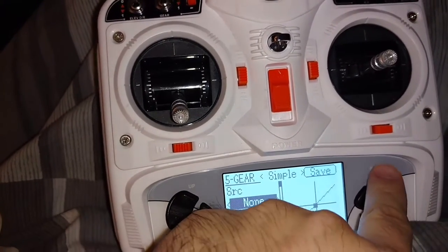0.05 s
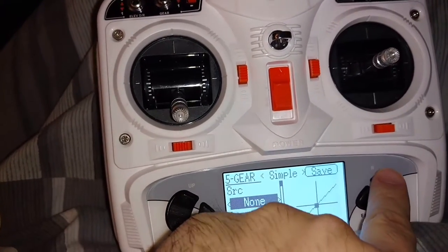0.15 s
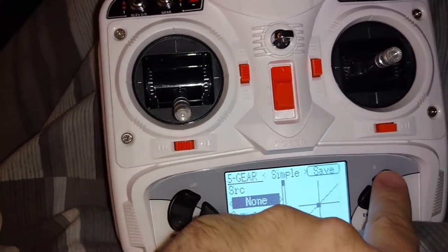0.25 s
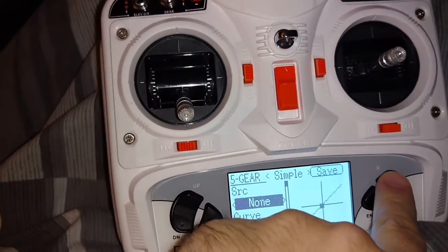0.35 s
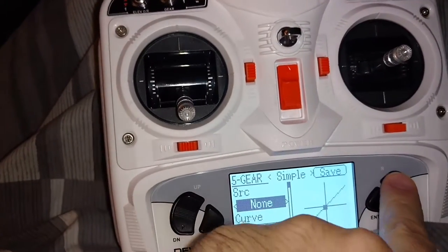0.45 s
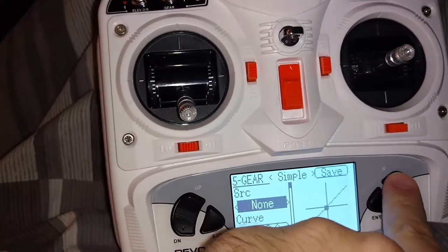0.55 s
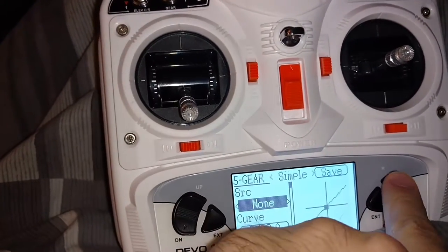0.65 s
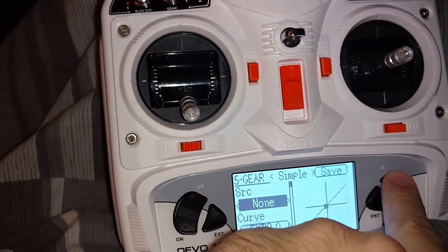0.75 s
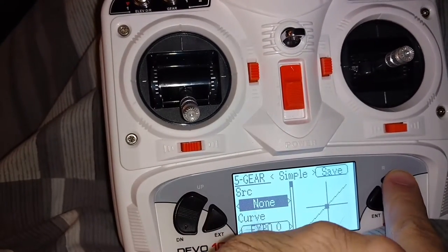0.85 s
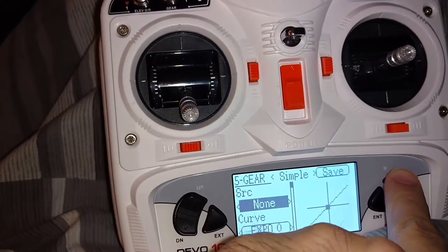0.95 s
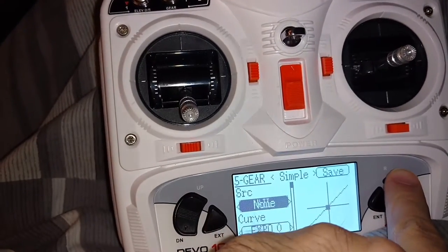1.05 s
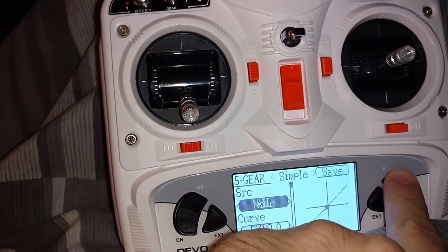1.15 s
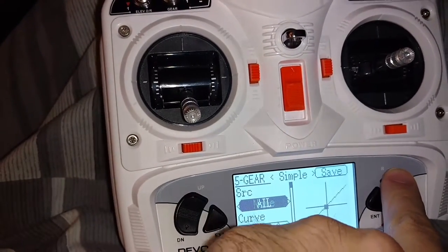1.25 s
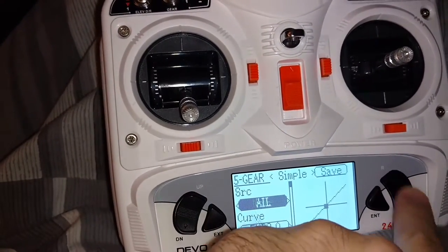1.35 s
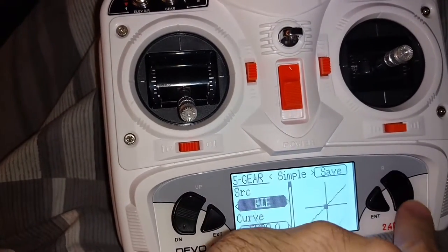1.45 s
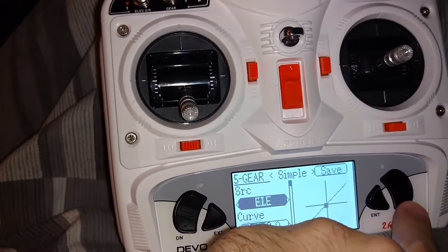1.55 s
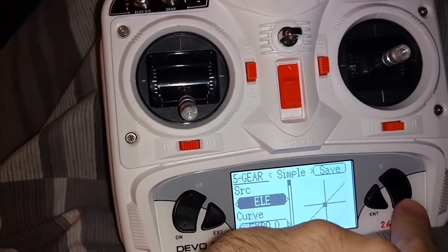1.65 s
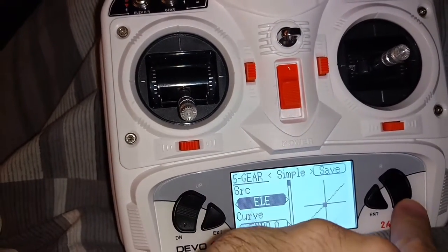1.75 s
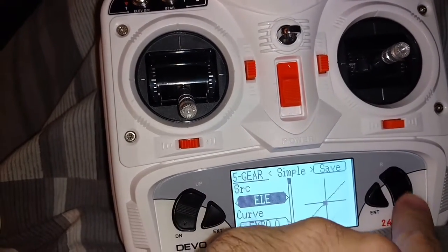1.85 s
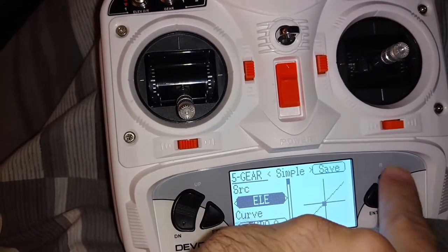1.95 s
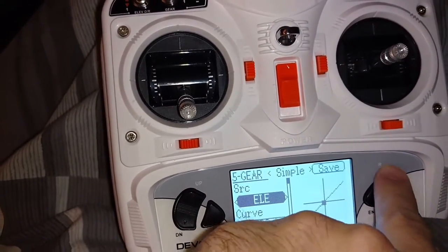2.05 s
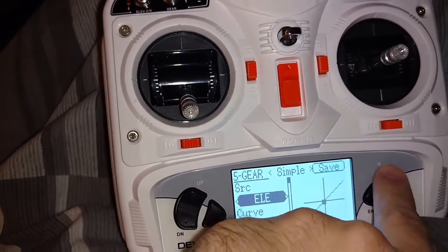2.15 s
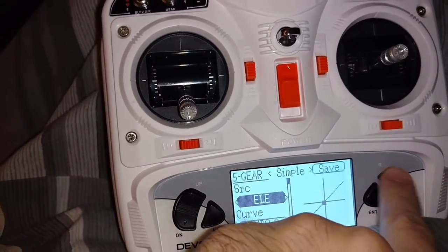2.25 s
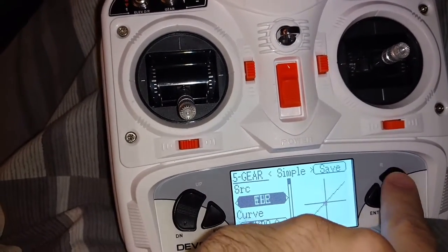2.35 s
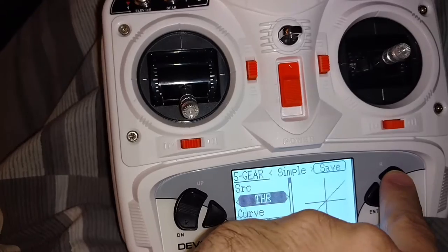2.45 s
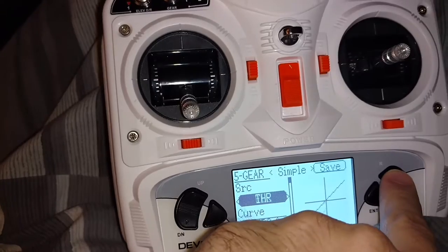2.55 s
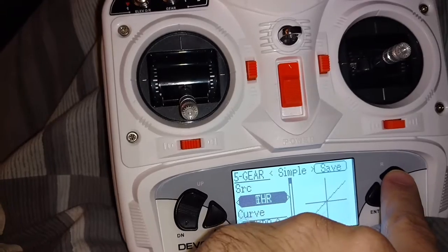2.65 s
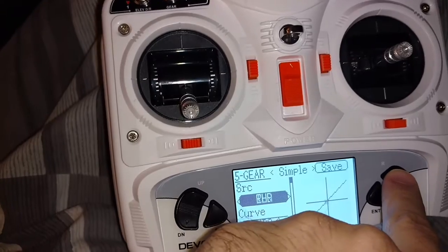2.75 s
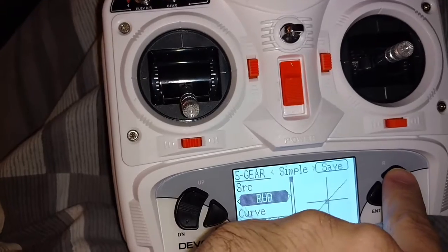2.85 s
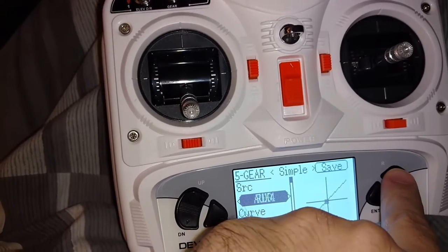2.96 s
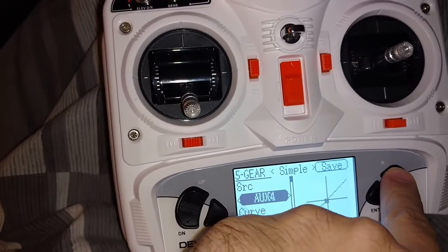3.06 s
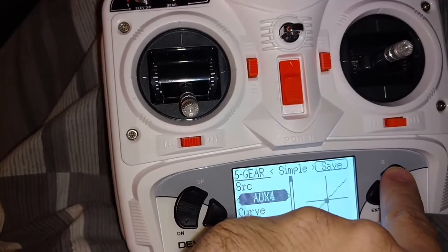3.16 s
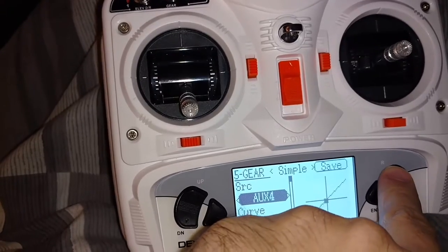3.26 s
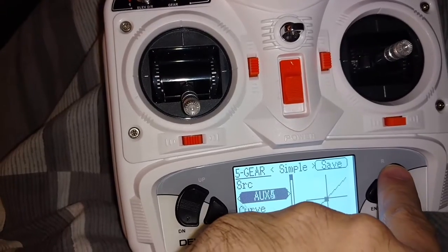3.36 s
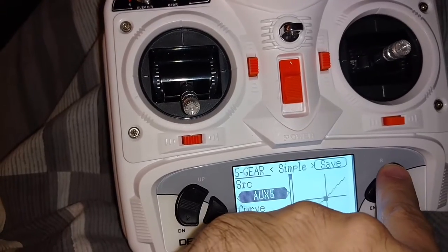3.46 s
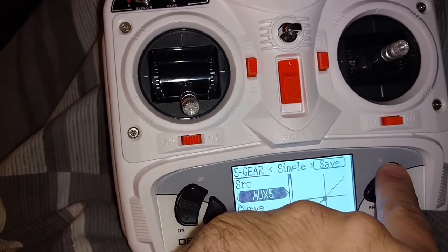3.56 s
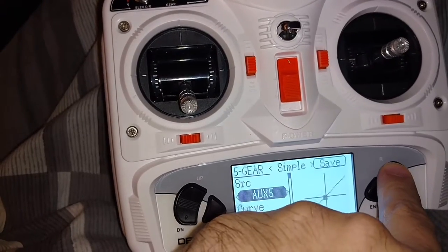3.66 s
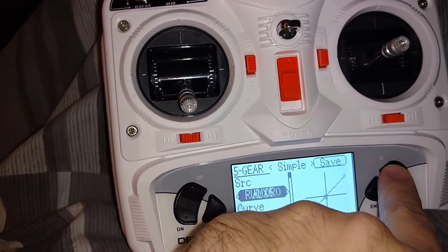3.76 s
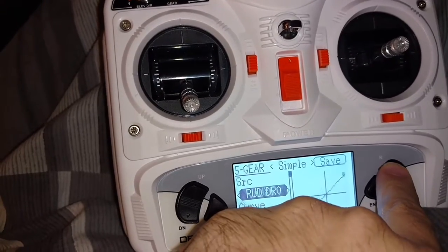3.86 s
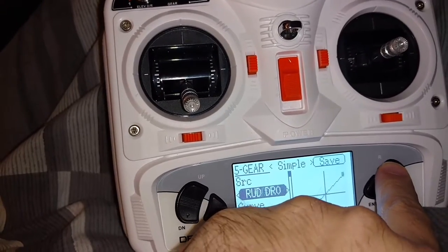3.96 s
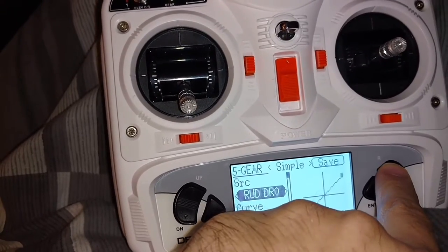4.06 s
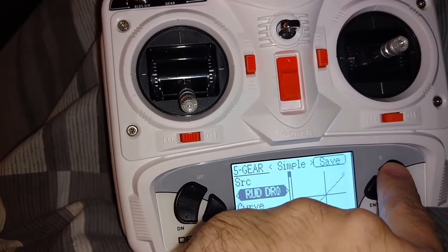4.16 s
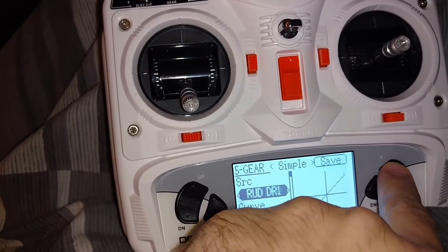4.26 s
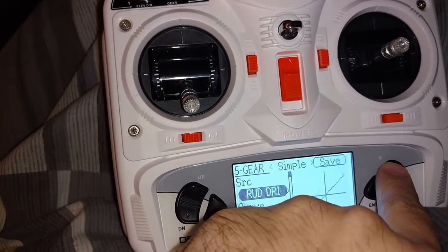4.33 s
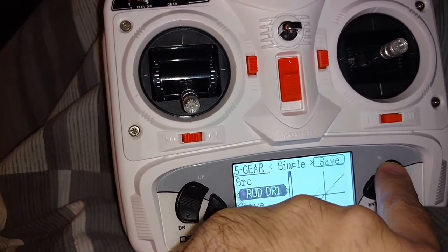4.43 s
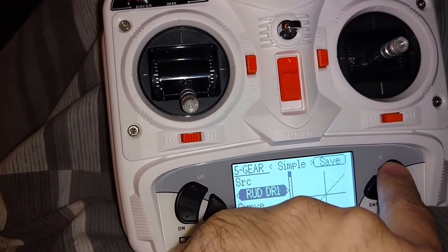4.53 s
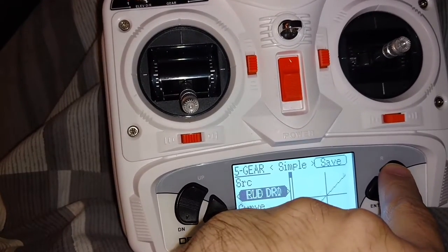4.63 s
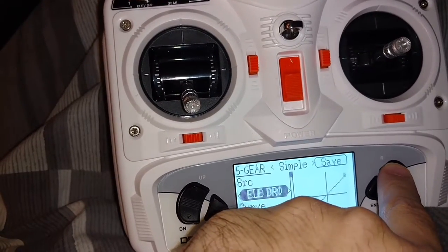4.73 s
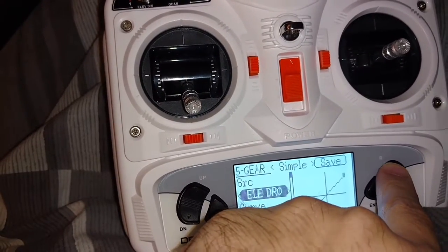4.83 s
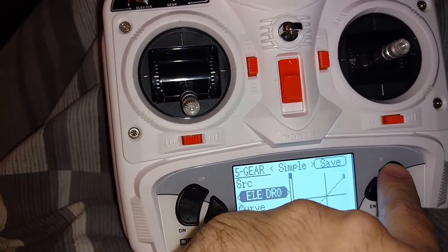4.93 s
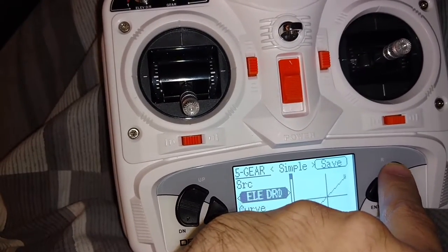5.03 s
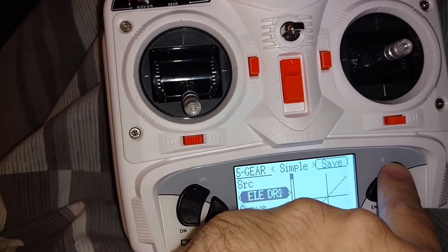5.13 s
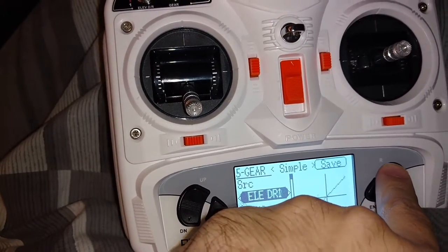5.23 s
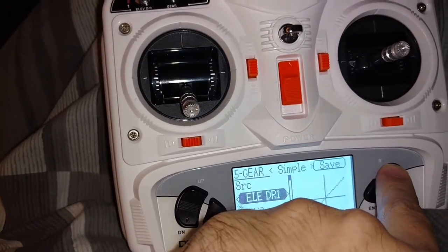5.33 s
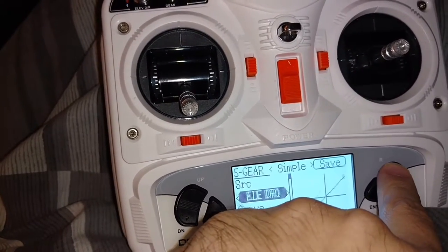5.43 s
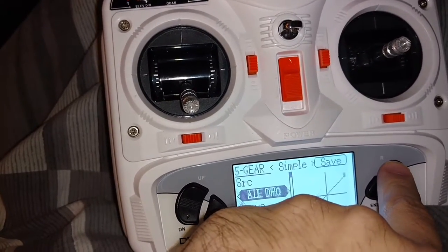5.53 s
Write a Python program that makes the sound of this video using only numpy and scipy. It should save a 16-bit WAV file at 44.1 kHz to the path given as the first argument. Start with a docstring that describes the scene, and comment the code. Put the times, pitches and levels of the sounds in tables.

```python
"""Dome-switch button on a hollow handset

In a quiet bedroom a thumb works a button: each press and release snaps a dome switch, exciting decaying
modes of dome and hollow case, with a noisy crack, a dull room tail and a bright echo. Below lie coloured
room noise, sine hum and whines, a regular resonant tick and sleeve rustle made of dense noise slips.
Two capsules listen, far (left) and near (right) for the button; the recorder widens the image by
subtracting from each a late copy of the other, then turns down loud sound and cuts the top."""
import sys
import numpy as np
from scipy import signal
from scipy.fft import rfft, irfft, next_fast_len
from scipy.io import wavfile
from scipy.ndimage import uniform_filter1d

SR = 44100
rng = np.random.default_rng(int(sys.argv[2]) if len(sys.argv) > 2 else 0)


def unload_wav(signal):
    """Save mono or channel-first audio to the path in sys.argv[1] as 16-bit WAV at rate SR, clipped to [-1, 1]."""
    wavfile.write(
        sys.argv[1],
        SR,
        np.round(np.clip(np.atleast_2d(signal).T, -1, 1) * 32767).astype(np.int16),
    )


N = 246519
HISS_EDGE_HZ = 15300   # room tone and rustle end here


def amp(db):
    """Logarithmic level: decibels to amplitude gain."""
    return 10 ** (np.asarray(db) / 20)


def at_hz(points, hz, column=1):
    """Spectral envelope: a table column interpolated on a log-frequency axis."""
    p = np.array(points)
    return np.interp(np.log(hz + 1), np.log(p[:, 0]), p[:, column])


def ring(clicks, hz, t60):
    """Damped resonator: a unit click starts a decaying sine of initial height 1."""
    radius = amp(-60 / (t60 * SR))
    angle = 2 * np.pi * hz / SR
    # the tiny offset keeps the filter state from fading to zero
    return signal.lfilter([0, np.sin(angle)], [1, -2 * radius * np.cos(angle), radius ** 2], clicks + 1e-18)


def train(times, sizes):
    """Impulse excitation: clicks of the given sizes at the given times in seconds."""
    out = np.zeros(N)
    out[np.round(np.asarray(times) * SR).astype(int)] = sizes
    return out


# Spectrum of room tone and capsule hiss:
# (frequency [Hz], left density [dB per Hz], right density [dB per Hz], likeness of the capsules [0-1])
ROOM_TONE = [(30.3, -90.5, -94, 1), (94, -78.5, -78, 1), (208, -78, -72.5, 0.97), (327, -76, -72.5, 1),
             (578, -83.5, -78, 0.86), (866, -93, -93.5, 0.44), (1360, -88.5, -92, 0), (2160, -90.5, -97, 0),
             (2552, -83, -129.5, 0), (3125, -100, -95.5, 0.12), (6200, -101, -102, 0), (9220, -97, -103, 0),
             (11500, -108, -109, 0), (15600, -109, -110, 0.3)]
DRONE_HZ, DRONE_WIDTH_HZ, DRONE_DB = 356, 16, 7   # a narrow hump on that spectrum


def room_tone():
    """Partial coherence: noise alike in both capsules in the bass, mostly unrelated in the treble."""
    hz = np.fft.rfftfreq(N, 1 / SR)
    shared, left, right = rfft(rng.standard_normal((3, N)))
    alike = np.clip(at_hz(ROOM_TONE, hz, column=3), 0, 1)
    pair = np.sqrt(alike) * shared + np.sqrt(1 - alike) * np.array([left, right])
    colour_db = np.array([at_hz(ROOM_TONE, hz, column=1), at_hz(ROOM_TONE, hz, column=2)])
    drone_db = DRONE_DB / (1 + (2 * (hz - DRONE_HZ) / DRONE_WIDTH_HZ) ** 2)
    colour = amp(colour_db + drone_db) * (hz < HISS_EDGE_HZ)
    return irfft(pair * colour, N) * np.sqrt(SR / 2)


BEAT_S, FIRST_BEAT_S, SLIP_AT_S, SLIP_S = 0.32, -0.0103, 1.8, 0.0133


def beats():
    """Periodicity: a steady beat in seconds that slips late once and stays shifted."""
    s = np.arange(FIRST_BEAT_S, N / SR - SLIP_S, BEAT_S)
    return s + SLIP_S * (s > SLIP_AT_S)


HUM_HZ, STEADY_WHINE_HZ, WHINE_HZ = 120, 6993, 7913
HUM_DB, STEADY_WHINE_DB, WHINE_DB = (-57, -54), (-107, -74.5), (-88, -70)   # RMS at left, right capsule
WHINE_ON_S = 0.2   # the upper whine sounds this long after each beat


def tones():
    """Pure tones: mains hum, a steady whine and a whine gated by the beat."""
    t = np.arange(N) / SR
    spells = sum(((t > s) & (t < s + WHINE_ON_S)) * 1. for s in beats())
    gate = uniform_filter1d(spells, size=900)   # eased edges
    parts = [(HUM_HZ, HUM_DB, 1), (STEADY_WHINE_HZ, STEADY_WHINE_DB, 1), (WHINE_HZ, WHINE_DB, gate)]
    out = np.zeros((2, N))
    for hz, rms_db, envelope in parts:
        peak = np.sqrt(2) * amp(rms_db)[:, None]
        out += peak * envelope * np.sin(2 * np.pi * hz * t)
    return out


# Relative spectrum of the cloth: (frequency [Hz], density [dB per Hz])
RUSTLE_COLOUR = [(300, -5), (900, 20), (2500, 13), (6000, 5), (14000, -0.5)]
# Drags of the sleeve on the bedding: (peak reached [s], hold [s], level [dB])
DRAGS = [(.57, 0.13, -51.5), (2.0, 0.011, -52.5), (2.382, 0.012, -52.5)]
DRAG_RISE_DB_PER_S, DRAG_FALL_DB_PER_S, REST_DB = 148, 170, -63.5   # REST_DB is the floor between drags
SLIP_SPREAD_DB, CLUMP_DB = 2.5, 2


def rustle():
    """Stick-slip friction: dense uneven fibre slips come in clumps, coloured by the cloth."""
    hz = np.fft.rfftfreq(N, 1 / SR)
    clumps = uniform_filter1d(rng.standard_normal(N), size=300)
    clump_db = CLUMP_DB * clumps / clumps.std()
    slip_db = SLIP_SPREAD_DB * np.minimum(rng.exponential(1, N), 4)
    slips = rng.standard_normal((2, N)) * amp(slip_db + clump_db)
    cloth = irfft(rfft(slips) * amp(at_hz(RUSTLE_COLOUR, hz)) * (hz < HISS_EDGE_HZ), N)
    t = np.arange(N) / SR
    drags_db = []
    for s, hold, db in DRAGS:
        rise_db = DRAG_RISE_DB_PER_S * np.maximum(s - t, 0)
        fall_db = DRAG_FALL_DB_PER_S * np.maximum(t - s - hold, 0)
        drags_db.append(db - rise_db - fall_db)
    level_db = np.maximum(np.max(drags_db, axis=0), REST_DB)
    return amp(level_db) * cloth / cloth.std()


# Resonances of a tick: (frequency [Hz], t60 [s], level [dB])
TICK_MODES = [(6230, 0.013, 8), (8800, .003, -5), (4570, 0.011, 9.5)]
# Like ticks off the beat: (time [s], level before the modes [dB])
ODD_TICKS = [(2.3898, -49), (4.793, -58)]
TICK_DB, TICK_SCATTER_DB, SKIPPED_TICK_S, TICK_CUT_HZ = -55, 1.5, 3.2, 9500


def ticks():
    """Impulse response: each tick is a dry click of damped modes, nearer the left capsule."""
    odd_s, odd_db = np.transpose(ODD_TICKS)
    s = beats()[1:]
    s = s[abs(s - SKIPPED_TICK_S) > BEAT_S / 2]   # one beat stays silent
    regular_db = TICK_DB + TICK_SCATTER_DB * rng.standard_normal(len(s))
    s, level_db = np.append(s, odd_s), np.append(regular_db, odd_db)
    click = sum(ring(train(s, amp(level_db + mode_db)), hz, t60) for hz, t60, mode_db in TICK_MODES)
    click = signal.lfilter(*signal.butter(2, TICK_CUT_HZ, fs=SR), click)
    return amp([[0], [-7]]) * click


# Dome collapses: (time [s], knock on the case [dB], snap [dB], brightness [dB])
PRESSES = [(0.7865, -14.5, -13.5, -1.5), (1.302, -14, -12, -1), (2.1785, -15.5, -15, -3.5),
           (2.5502, -15.5, -11.5, -3), (3.139, -12.5, -16, -1.5), (3.571, -14.5, -20, -4.5),
           (3.949, -13, -17, -3), (4.4283, -13.5, -18, -3.5), (4.8606, -14.5, -19, -3.5),
           (5.281, -13.5, -16, -0.5)]
# Dome springs back: (time [s], knock on the case [dB], snap [dB], brightness [dB], hardness [dB])
RELEASES = [(1.0057, -18.5, -24.5, -1.5, 16.5), (1.42, -13.5, -16.5, -1.5, 8), (2.335, -17.5, -43, -9, 1),
            (2.9375, -16, -36.5, -4, 2), (3.2639, -16, -43.5, 8, 0.5), (3.7316, -19.5, -42, 5, 0),
            (4.1556, -20, -31, -6, 2), (4.607, -21.5, -39, -3, -3), (5.0457, -17.5, -46, 1, 3.5),
            (5.4463, -17.5, -45, 7, -4)]
# Small creaks of the dome under the resting thumb: (time [s], level [dB])
CREAKS = [(1.499, -43), (1.985, -35.5), (2.009, -37.5), (2.3597, -32), (2.389, -59), (2.5102, -61),
          (3.7414, -42), (4.2647, -53), (4.6917, -57)]
# Case modes: (frequency [Hz], t60 [s], press level [dB], release level [dB], far re near capsule [dB])
CASE = [(334.5, 0.053, -2.5, -2, -3), (570.4, 0.049, -13, -11.5, 0.5), (798, 0.029, -6, -3.5, -43),
        (882.6, 0.019, -5, -4.5, -0.5), (1059, 0.012, -5.5, -2.5, -3), (1446, 0.013, -55.5, -12.5, -17),
        (1665, 0.022, -4.5, -12, -5.5)]
# Dome and button modes: (frequency [Hz], level [dB], far re near capsule [dB])
DOME = [(2890, -16.5, 7), (3459, 1.5, -41.5), (3730, -7, -49), (4430, -0.5, -49), (4320, -9, -36),
        (4890, -12, 5), (6070, -5.5, -19), (5780, -13.5, -32), (7900, -13.5, 7), (14300, -17, -5)]
# how the case colour follows the blow; pairs are (press, release)
USUAL_KNOCK_DB, USUAL_SNAP_DB = (-15, -16), -15
# the deep modes gain less than the rest from a stronger knock
USUAL_DEPTH_DB, DEPTH_PER_KNOCK_DB, DEEP_BELOW_HZ = (-0.4, 0.86), (-0.6, -1), 700
# on a press a sharper snap wakes the upper case modes
USUAL_HARD_DB, HARD_PER_SNAP_DB, HARD_FROM_HZ = 1.5, 1, 1300
YIELD_LEAD_S, YIELD_DB, PUSH_LEAD_S = 0.00089, -7, 0.0006
KNOCK_CUT_HZ, CASE_LOW_HZ, CREAK_KNOCK_DB = 887, 315, -7.5
BRIGHT_FROM_HZ, SNAP_SCATTER_DB, SNAP_CUT_HZ, DOME_RING_CYCLES = 4000, 1.5, 10100, 30
CRACK_DB, CRACK_T60_S, CRACK_HZ = -7, 0.021, (4120, 6900)   # noisy part of a snap


def button():
    """Modal excitation: press and release push the case oppositely; returns far and near capsule."""
    presses = [row + (USUAL_HARD_DB + HARD_PER_SNAP_DB * (row[2] - USUAL_SNAP_DB),) for row in PRESSES]
    rows = np.array(presses + RELEASES)
    s, knock_db, snap_db, bright_db, hard_db = rows.T
    creak_s, creak_db = np.transpose(CREAKS)
    pressed = np.arange(len(rows)) < len(PRESSES)
    kind = 1 - pressed   # 0 press, 1 release
    extra_knock_db = knock_db - np.take(USUAL_KNOCK_DB, kind)
    depth_db = np.take(USUAL_DEPTH_DB, kind) + np.take(DEPTH_PER_KNOCK_DB, kind) * extra_knock_db
    sign = np.where(pressed, -1, 1)
    case, dome = np.zeros((2, N)), np.zeros((2, N))
    chance = rng.normal(0, 1, (len(rows), len(CASE) + len(DOME))).T

    for (hz, t60, press_db, release_db, far_db), luck in zip(CASE, chance):
        colour_db = depth_db * (hz < DEEP_BELOW_HZ) + hard_db * (hz > HARD_FROM_HZ)
        mode_db = np.where(pressed, press_db, release_db)
        size = sign * amp(knock_db + mode_db + colour_db + luck)   # 1 dB scatter
        # the dome first yields the other way, then snaps through
        push = train(s - PUSH_LEAD_S, size) - train(s - YIELD_LEAD_S, size * amp(YIELD_DB))
        # a creak also nudges the case
        push += train(creak_s, amp(creak_db + release_db + CREAK_KNOCK_DB))
        case += amp([[far_db], [0]]) * ring(push, hz, t60)
    # the push is rounded, and a small case radiates no bass
    case = signal.sosfilt(signal.butter(2, KNOCK_CUT_HZ, fs=SR, output="sos"), case)
    case = signal.sosfilt(signal.butter(4, CASE_LOW_HZ, "high", fs=SR, output="sos"), case)

    for (hz, level_db, far_db), luck in zip(DOME, chance[len(CASE):]):
        upper = hz > BRIGHT_FROM_HZ
        snap = train(s, sign * amp(snap_db + level_db + upper * bright_db + SNAP_SCATTER_DB * luck))
        # creaks are set relative to the strongest mode, too soft to reach the upper modes fully
        snap += train(creak_s, amp(creak_db + level_db - DOME[1][1] - 10.8 * upper))
        # plastic loses the same share on every cycle
        dome += amp([[far_db], [0]]) * ring(snap, hz, DOME_RING_CYCLES / hz)
    dome = signal.lfilter(*signal.butter(1, SNAP_CUT_HZ, fs=SR), dome)   # the snap is not instant

    crack_starts = train(s, amp(snap_db + bright_db + CRACK_DB))
    dying = signal.lfilter([1], [1, -amp(-60 / (CRACK_T60_S * SR))], crack_starts)
    crack = dying * rng.standard_normal((2, N))
    crack = signal.lfilter(*signal.butter(1, CRACK_HZ, "band", fs=SR), crack)
    return case + dome + amp([[-8], [0]]) * crack


ROOM_T60_S, ROOM_DB, ROOM_CUT_HZ = 0.19, -28.5, 1120


def room(x):
    """Diffuse reverberation: a short dull noise tail of its own for each capsule."""
    n = np.arange(SR // 4)
    decay = amp(-60 * n / SR / ROOM_T60_S) * (n > .004 * SR)
    tail = rng.standard_normal((2, len(n))) * decay
    tail = signal.lfilter(*signal.butter(1, ROOM_CUT_HZ, fs=SR), tail)
    tail /= np.sqrt(np.sum(tail ** 2, axis=1, keepdims=True))   # unit energy
    return amp(ROOM_DB) * signal.fftconvolve(x[None], tail, axes=1)[:, :N]


ECHO_LAG_S, ECHO_DB, ECHO_LOW_HZ, ECHO_T60_S = 0.0122, -25, 3550, 0.11


def echo(x):
    """Delayed reflection: treble thrown back by hard walls sets in after a gap and scatters away."""
    t = np.arange(SR // 10) / SR - ECHO_LAG_S
    tail = rng.standard_normal((2, len(t))) * amp(-60 * t / ECHO_T60_S) * (t > 0)
    tail /= np.sqrt(np.sum(tail ** 2, axis=1, keepdims=True))   # unit energy
    bright = signal.lfilter(*signal.butter(2, ECHO_LOW_HZ, "high", fs=SR), x)
    return amp(ECHO_DB) * signal.fftconvolve(bright[None], tail, axes=1)[:, :N]


FAR_LAG_S = 0.00011   # extra travel time to the far capsule


def scene():
    """Superposition: the handset, its room and the background add linearly."""
    far, near = button()
    n = np.arange(N)
    direct = np.array([np.interp(n - FAR_LAG_S * SR, n, far), near])
    return direct + room(near) + echo(near) + room_tone() + tones() + rustle() + ticks()


# Response of the late copy fed across the capsules: (frequency [Hz], gain [dB])
CROSS_GAIN = [(100, -1.5), (1500, -2.5), (4500, 0.4), (7000, -14.5), (12000, -9.5)]
CROSS_LAG_S, CUTOFF_HZ = 0.000448, 16700
LIMIT_DB, RECOVERY_DB_PER_S = -6.5, 14


def record(dry):
    """Cross-feed and gain control: subtracted late copies, a slowly recovering limiter, the top cut."""
    size = next_fast_len(N + 256)
    hz = np.fft.rfftfreq(size, 1 / SR)
    late = amp(at_hz(CROSS_GAIN, hz)) * np.exp(-2j * np.pi * hz * CROSS_LAG_S)
    wide = dry - irfft(rfft(dry[::-1], size) * late, size)[:, :N]
    peak_db = 20 * np.log10(np.abs(wide).max(axis=0) + 1e-9)
    over_db = np.maximum(peak_db - LIMIT_DB, 0)
    # hold each excess while it falls at the recovery rate
    fall_db = RECOVERY_DB_PER_S * np.arange(N) / SR
    held_db = np.maximum.accumulate(over_db + fall_db) - fall_db
    smooth = np.exp(-1 / (0.023 * SR))   # the gain moves with a 23 ms time constant
    gain = amp(-signal.lfilter([1 - smooth], [1, -smooth], held_db))
    return signal.sosfilt(signal.cheby2(24, 70, CUTOFF_HZ, fs=SR, output="sos"), gain * wide)


dry = scene()
out = record(dry)
unload_wav(out)
```